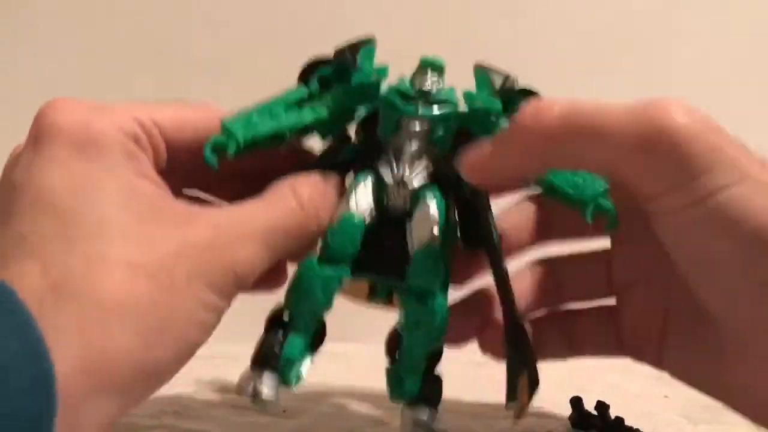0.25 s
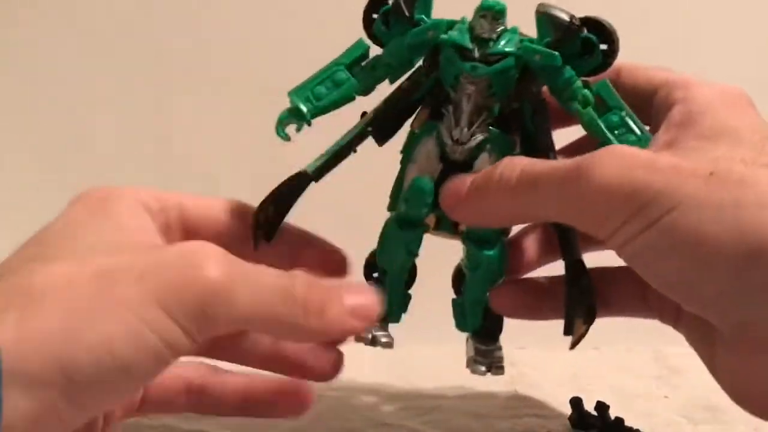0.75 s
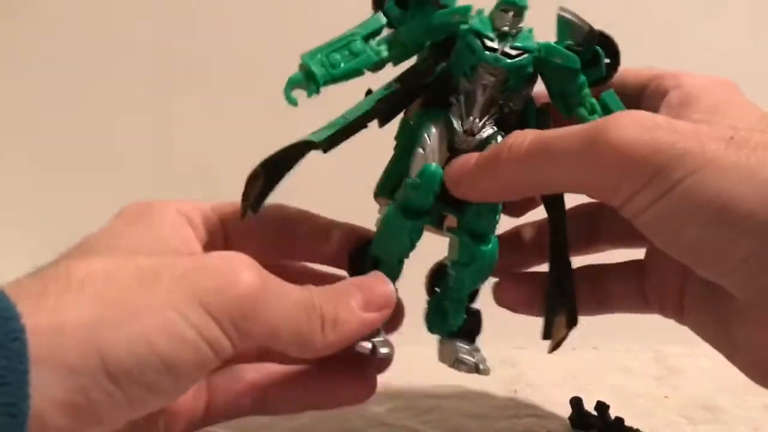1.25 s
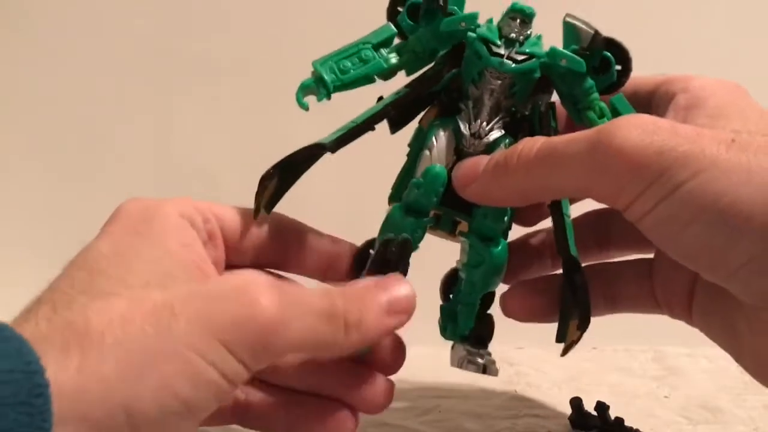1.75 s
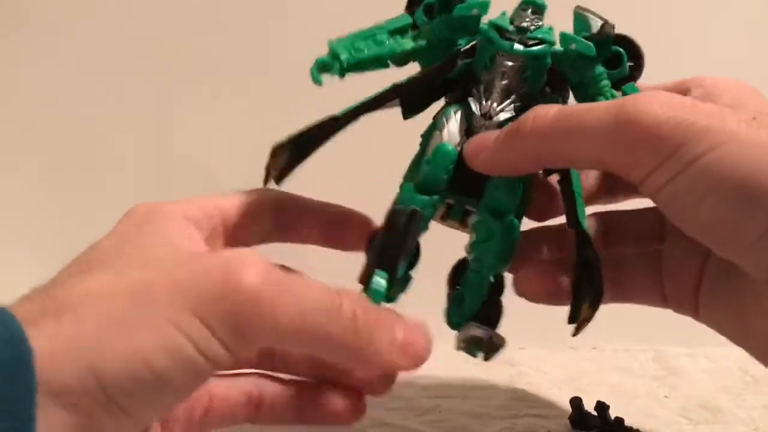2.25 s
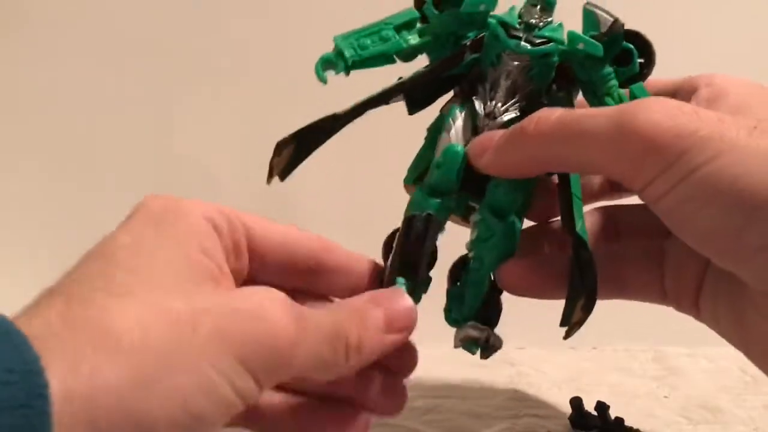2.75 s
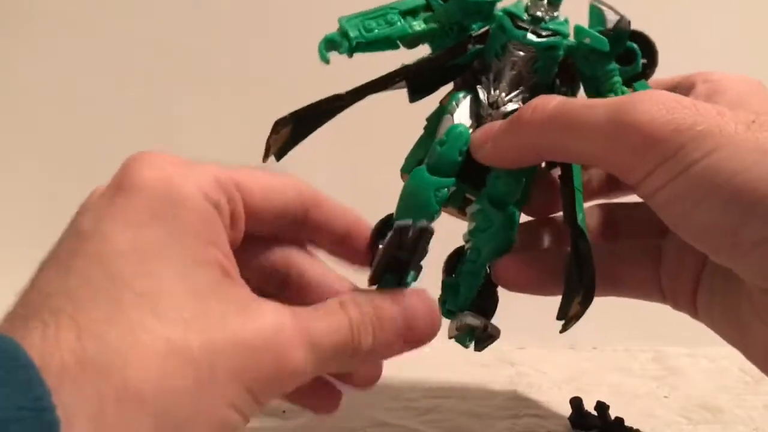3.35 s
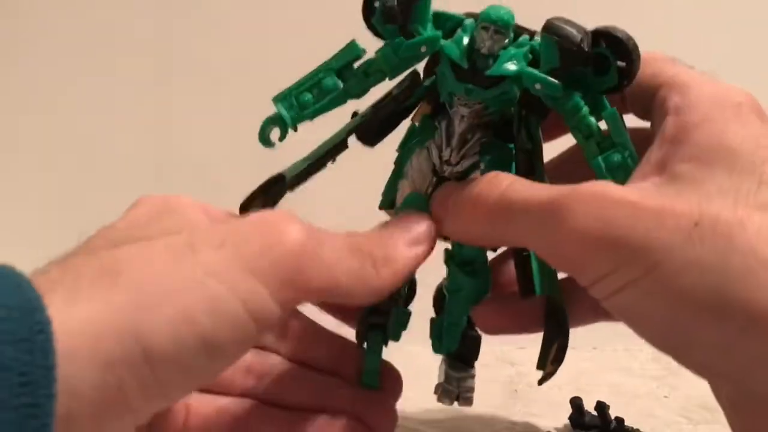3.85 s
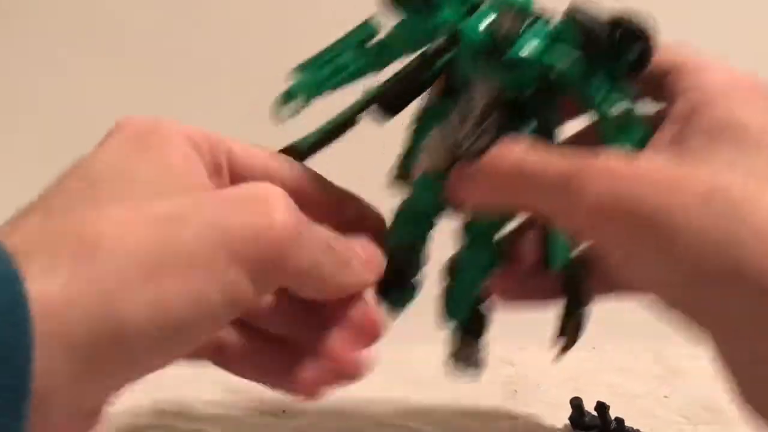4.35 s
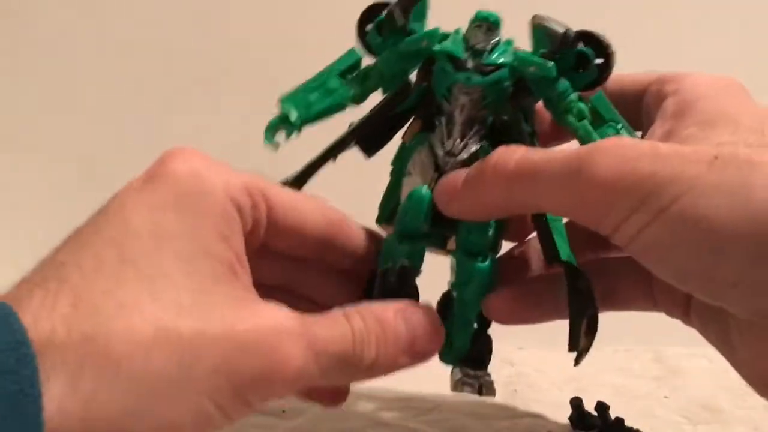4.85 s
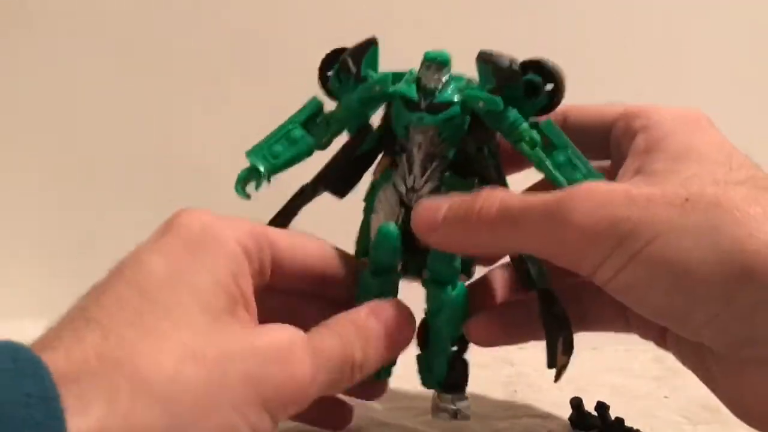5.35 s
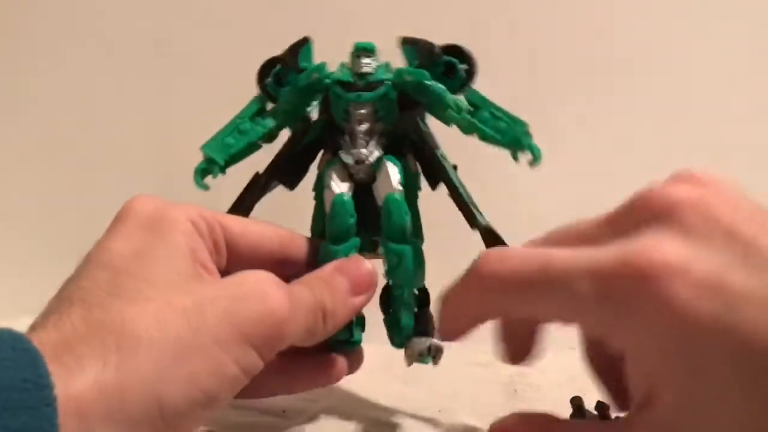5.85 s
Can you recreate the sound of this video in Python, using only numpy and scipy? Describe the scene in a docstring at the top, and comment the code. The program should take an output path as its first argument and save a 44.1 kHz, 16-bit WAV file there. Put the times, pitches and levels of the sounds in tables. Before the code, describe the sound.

Hands turn and fold a light plastic toy over a table. Rapid clattering clicks come first, peaking early, then thin out into tiny ticks, rustles and brief fingertip scuffs. Later a faint steady rush rises, a joint grates with clicks and a dull low bump, then a sharp snap knocks the table. Low hum and slight hiss lie beneath; close, dry, small-room sound.

```python
"""At a table in a quiet, humming room a hollow plastic figure is turned and folded close to a small microphone.
Joints click as scratchy bursts driving damped shell modes; loose panels rattle and rub as showers of ringing
grains. Dragged joints and sliding fingertips scratch as resonant noise. Hum, hiss and a passing steady rush are
coloured noise. A soft bump, and later a hard snap, set low modes of the table top ringing."""
import sys
import numpy as np
from scipy import signal
from scipy.fft import rfft, irfft, next_fast_len
from scipy.io import wavfile
from scipy.ndimage import uniform_filter1d, minimum_filter1d

SR = 44100
rng = np.random.default_rng(int(sys.argv[2]) if len(sys.argv) > 2 else 0)


def pcm_store(signal):
    """Save signal as 16-bit PCM."""
    levels = np.round(np.clip(np.atleast_2d(signal), -1, 1) * 32767)
    wavfile.write(sys.argv[1], SR, levels.astype(np.int16).T)


N = 269533

# room resonances in the hum: centre_hz, width_hz, level_db
HUM_RESONANCES = [(57, 13, -60), (132.8, 9.1, -66.5), (211.6, 19, -65.5), (303, 9.8, -75)]
# colour of the room hum: frequency_hz, density_db (relative, per Hz)
HUM_COLOUR = [(18, -35), (30, -3), (65, 4), (168, -11), (221, -7.5), (473, -20.5), (955, -23.5),
              (1330, -23), (2500, -36.5), (3250, -61.5), (5500, -120)]
# microphone hiss swelling and sinking: time_s, treble_level_db (above 9 kHz)
HISS_LEVEL = [(0, -68.5), (.2, -66.5), (.5, -79.5), (.66, -56.5), (.83, -68), (1.02, -66), (1.14, -73),
              (1.41, -80.5), (3.98, -75.5), (4.25, -71), (4.41, -81), (5.04, -70.5), (5.21, -64.5),
              (5.55, -71), (5.73, -80.5), (6.11, -74)]
# colour of the hiss: frequency_hz, density_db (relative, per Hz)
HISS_COLOUR = [(180, -21), (300, -3.5), (535, -8.5), (631, -10), (1040, -8.5), (1260, -11.5), (3470, -15.5),
               (12400, -20), (15600, -20)]
# steady rush: start_s, length_s, level_db
RUSHES = [(3.48, 1.6, -60.5), (5.12, 0.42, -67.5)]
# colour of the rush: frequency_hz, density_db (relative, per Hz)
RUSH_COLOUR = [(180, -36), (300, -1.5), (441, -0.5), (577, 0.5), (1050, 0.5), (1610, -4), (3570, -8.5),
               (6770, -26.5), (9000, -21.5), (11700, -63), (19800, -120)]
# parts rubbing in the fingers: time_s, level_db
HANDLING_LEVEL = [(0, -75), (.25, -77.5), (.8, -66.5), (1.3, -73), (1.5, -82), (2, -84.5), (2.3, -76.5),
                  (2.7, -84.5), (3.15, -82.5), (3.28, -75), (3.45, -76.5), (3.95, -74.5), (4.4, -65),
                  (4.7, -74.5), (5, -73.5), (5.35, -64), (5.6, -78.5), (6.11, -82.5)]
# joint clicks: start_s, peak_db, centre_hz (of the part that rings), treble_db, knock_db,
# burst_t60_s (limited to 0.002-0.2 s)
CLICKS = [(.2554, -42.5, 4146, -6, -4, 0.012), (.2835, -34.5, 3993, -23, -12, 0.023),
          (.2875, -28, 4630, -9.5, -9, 0.031), (.298, -30.5, 5450, -20, -9.5, 0.047),
          (.3145, -28.5, 5675, -22, -19, 0.018), (0.3242, -23, 5113, -16, -16, 0.0081),
          (0.3323, -38, 3920, -9, -2, 0.047), (0.3557, -28, 5080, -25, -18, 0.014),
          (0.4822, -36.5, 5480, -19, -12, 0.039), (0.4941, -23.5, 4240, -8, -19, 0.022),
          (0.5022, -26, 5540, -23, -8.5, 0.026), (.5267, -39.5, 3990, -16, -15, 0.03),
          (0.5378, -38.5, 5200, -8, -4, 0.019), (0.553, -18, 3660, -10.5, -11, 0.0078),
          (.5548, -17.5, 3425, -7.5, -10, 0.01), (0.574, -13, 4000, -33, -17, 0.0054),
          (0.5821, -36, 3874, -24, -14, 0.025), (0.6084, -23.5, 3993, -3, -3.5, 0.02),
          (0.6147, -18.5, 6300, -6, -11, 0.0046), (0.6189, -3, 4150, -8.5, -13.5, 0.0094),
          (0.6199, -16.5, 1735, -33, -23, 0.0027), (0.6227, -6.5, 5450, -5, -15.5, 0.035),
          (0.6289, -15, 5670, -9.5, -27, 0.0088), (.634, -24.5, 5870, -11.5, -25.5, 0.013),
          (.6508, -13.5, 5230, -12, -27, 0.015), (0.6722, -23, 5600, -20, -21, 0.01),
          (0.7185, -29, 5540, -15, -7, 0.19), (.7288, -25, 5495, 8, -15, 0.015),
          (.741, -17, 5630, -8.5, -21, 0.02), (0.7916, -38, 4090, 0, -17, .014),
          (0.8072, -35.5, 5820, -10, -7, 0.014), (0.8367, -44, 3627, -11, -6, 0.017),
          (0.9078, -22, 3416, -12, -17.5, 0.0095), (.9277, -30.5, 6100, -19, -11, .019),
          (0.9452, -37, 4390, -8, -17, 0.034), (.9586, -40, 3430, -15, -12, 0.018),
          (0.9689, -35, 5870, -21, -20, 0.0099), (1.013, -37.5, 5940, -9, -14, .01),
          (1.017, -15.5, 6390, 5, -12.5, .012), (1.0243, -31, 5980, -22, -14, 0.022),
          (1.0473, -42.5, 3075, -7, -15, .027), (1.0666, -35.5, 5410, -30, -12.5, 0.053),
          (1.0902, -48, 5280, -14, -16, .01), (1.1027, -40, 4010, -22, -7, 0.017),
          (1.159, -28.5, 5824, -23, -23, 0.016), (1.1654, -40.5, 7620, -3, -20, 0.0076),
          (1.203, -34, 4330, -9.5, -15.5, 0.014), (1.231, -49, 4130, -14, 1.5, 0.02),
          (1.283, -52, 4320, -12.5, -2, 0.0056), (1.3259, -50, 6020, -3, -13.5, .009),
          (1.334, -48.5, 4600, -3, -2.5, 0.033), (1.3969, -42, 5850, -16, -13.5, .006),
          (1.4166, -51.5, 3290, -14, -8, 0.013), (1.4571, -48.5, 2860, -13, -4, 0.022),
          (1.567, -43.5, 4320, -19, -6, .013), (1.5872, -49.5, 4310, -10, 0, 0.0091),
          (1.6268, -31, 5204, -21, -8, 0.0069), (1.6419, -43, 5400, -12.5, -3, 0.022),
          (1.6521, -45.5, 4180, -19, -15, .045), (1.6835, -44, 2846, -18, -4.5, 0.026),
          (1.8278, -40, 4355, -8.5, -15.5, .015), (1.862, -38, 4807, -20, -11, 0.016),
          (2.0717, -42.5, 5694, -10.5, -19, 0.023), (2.0971, -40.5, 5910, -15, -10, 0.12),
          (2.11, -31, 5774, -23, -14, 0.018), (2.119, -39, 5870, -21, -14, 0.016),
          (2.1518, -33.5, 5425, -20, -9.5, .024), (2.1836, -35.5, 5850, -21.5, -18, .012),
          (2.2792, -35, 5670, -10.5, -14.5, 0.021), (2.314, -47.5, 5540, -14, -10, 0.037),
          (2.443, -53.5, 5577, -16, -11, 0.004), (2.498, -50.5, 5596, -9.5, -10, 0.017),
          (2.5514, -31.5, 5815, 3.5, -5, 0.024), (2.658, -52, 2978, -14, -6, 0.026),
          (2.6788, -45, 2930, -19.5, -2, 0.022), (2.7026, -50.5, 4895, -15, -5, 0.0097),
          (2.7467, -41.5, 4220, -14, -2, 0.009), (2.7542, -51.5, 4320, -12, -3, 0.0099),
          (2.7683, -50, 4370, -18, -11, 0.0046), (2.779, -53.5, 4350, -14.5, -7.5, .005),
          (2.8414, -49.5, 4500, 0, -9, .016), (2.8532, -54, 4346, -10.5, -8, 0.0075),
          (2.9338, -47.5, 3458, -22, -8, 0.033), (2.9373, -36, 4570, -15, -15, 0.011),
          (2.9672, -47.5, 4310, -3, -7, 0.0099), (2.9887, -37, 4480, -1, -4, 0.022),
          (3.0361, -40, 4290, -12, -7, 0.0018), (3.048, -53, 3786, -7, 0, 0.017),
          (3.0627, -55, 2610, -5, -15, 0.033), (3.0744, -40, 7500, -4, -13, .009),
          (3.121, -44.5, 4174, -8.5, -7, .007), (3.172, -50.5, 4393, -13, -7, .009),
          (3.2022, -39.5, 7190, 3.5, -6.5, 0.011), (3.3047, -50.5, 2840, -10, -2, 0.073),
          (3.3222, -41.5, 4180, -11, -6.5, 0.0069), (3.4295, -50.5, 5170, -8.5, 1.5, 0.02),
          (3.8922, -44, 2930, -8, -3, 0.014), (4.008, -39, 5600, -10, -13, 0.013),
          (4.0157, -43.5, 5333, -5, -19, .044), (4.0287, -44, 5660, -11, -7, .032),
          (4.0708, -23.5, 5820, 2.5, -2, 0.0059), (4.0785, -37.5, 5460, -13, -20, 0.16),
          (4.0876, -38.5, 6000, -5, -32, 0.078), (4.1821, -25.5, 4210, -3, -5.5, 0.0037),
          (4.1937, -39.5, 4330, -3, -6, 0.082), (4.2657, -20, 5785, 0.5, -7, 0.041),
          (4.2757, -24.5, 5443, -1.5, -11, 0.14), (4.3501, -29.5, 2794, -17, 6.5, 0.015),
          (4.3526, -35.5, 1723, -30, -21, 0.014), (4.361, -42.5, 4060, -8, -1, 0.2),
          (4.416, -40, 3100, -1, 9, 0.025), (4.4553, -31.5, 5720, -16, -2.5, 0.0052),
          (4.474, -43, 6010, -18, -4, 0.022), (4.5947, -37, 5760, -5, -12, 0.058),
          (4.6058, -40, 5800, -23, -15, 0.022), (4.7025, -42, 4015, -7.5, 7.5, 0.16),
          (4.727, -46, 4220, -15, 6, 0.053), (4.967, -37, 4960, -14, -2.5, .015),
          (4.975, -46, 5100, -12.5, -13.5, 0.12), (4.9867, -46, 4940, -19, -7, 0.014),
          (5.0393, -38, 7190, 9, -25, 0.0034), (5.049, -39, 7350, -2, -27.5, 0.011),
          (5.0571, -29.5, 7350, -6, -23.5, 0.011), (5.0598, -3.5, 7430, -5, -9, 0.0083),
          (5.0619, -6, 4663, 4, -10.5, 0.016), (5.0605, -20.5, 719, -24, -16, 0.0094),
          (5.068, -25.5, 5100, -5.5, -31.5, 0.38), (5.0736, -23, 7220, -1.5, -36, 0.28),
          (5.089, -26, 7200, 0.5, -36, .03), (5.2426, -30, 4050, -9, -21, 0.0046),
          (5.27, -37.5, 4058, 10, 2, .027), (5.2959, -42, 6240, -17, -13, 0.031),
          (5.308, -37, 7260, -9, -8.5, 0.023), (5.3278, -37, 3540, -10, -15, 0.068),
          (5.335, -35, 6020, -12, -14, 0.015), (5.3402, -30.5, 5940, -16, -31, 0.04),
          (5.3609, -38.5, 6314, -6, -11, 0.013), (5.4523, -39.5, 3994, -5, 11, 0.0082),
          (5.4852, -36, 4344, -13, -17, 0.037), (5.4963, -22.5, 4200, -14, -12, 0.013),
          (5.4995, -33.5, 1173, -12, -30, 0.0067), (5.514, -43, 4200, -12, -15, 0.082),
          (5.546, -43.5, 4320, -8, -20, .023), (5.5691, -51, 3380, -20, -18, 0.022),
          (5.9328, -48, 3796, -13, -7.5, .008), (5.9521, -50, 3623, -11, -3.5, 0.031),
          (5.958, -53.5, 5660, -21, -20, 0.077), (6.054, -42, 3453, -31, -8, 0.021),
          (6.0652, -35, 3500, -25, -21.5, 0.025), (6.0649, -37.5, 6150, -25, -13, 0.016),
          (6.0852, -39.5, 6150, -31.5, -12, 0.018)]
# broad, damped modes of the plastic shells: centre_hz, width_hz, gain_db
SHELL_MODES = [(540, 210, -0.5), (1137, 320, 0), (1970, 400, -2), (2980, 500, 6), (3900, 750, 1.5),
               (4430, 390, 6), (5090, 1100, 0.5), (5850, 790, 6.5), (6290, 970, 2), (6995, 540, 2.5),
               (9070, 1700, -6.5), (11460, 540, -4), (12250, 1000, -6), (13830, 1400, -7.5),
               (14600, 1700, -15)]
# reverberation of the room: frequency_hz, t60_s
ROOM_DECAY = [(300, 0.12), (1500, 0.17), (4000, 0.12), (12000, 0.16)]
# modes of the leg joint: centre_hz, width_hz, gain_db
JOINT_MODES = [(3040, 280, -7.5), (4490, 60, -9.5), (5750, 180, -6), (6100, 78, -4), (8670, 77, -11.5),
               (10000, 200, -24), (11900, 300, -28)]
# strokes of the joint dragged round: start_s, length_s, level_db (at the start)
DRAG_STROKES = [(1.55, 0.075, -66), (1.63, 0.077, -63.5), (2.28, .05, -62.5), (2.5, 0.063, -66),
                (2.56, 0.093, -64), (2.66, 0.037, -63), (4.38, 0.082, -54.5), (4.452, .08, -54),
                (4.543, .055, -61), (4.594, 0.093, -53)]
# fingertips sliding on smooth panels: start_s, length_s, level_db, centre_hz, width_hz
FINGER_SLIDES = [(1.337, 0.025, -72.5, 4930, 3000), (3.062, .025, -58.5, 9200, 1500),
                 (3.204, 0.06, -64.5, 8700, 2550), (3.257, 0.046, -63, 8300, 3500),
                 (3.291, 0.076, -73, 12600, 3010), (3.44, 0.058, -68, 9070, 5970),
                 (4.71, 0.056, -70.5, 9000, 6000), (5.523, 0.035, -63, 7900, 7160)]
# blows to the table: start_s, level_db, decay_ratio (to the free table), contact_s (time constant)
THUDS = [(4.471, -19.5, 1, 0.00079), (5.0605, -17.5, 0.35, 0.00023)]
# modes of the free table top: frequency_hz, gain_db, t60_s
TABLE_MODES = [(59.8, -11, 0.36), (127.2, -2.5, 0.064), (190, -9.5, 0.15), (431.5, -12, 0.065),
               (620, -18.5, 0.067)]

HUM_DB = -63.5  # rms of the broad hum
# rattle after a click: dB at a 0 dB click, dB per dB of click, s
RATTLE_DB, RATTLE_GROWS, RATTLE_T60_S = -42.5, 0.92, 0.39
HANDLING_HZ = 4260
HANDLING_SPREAD, RATTLE_SPREAD = 0.19, 0.23  # scatter of the grains' pitch (log Hz)
ROOM_DB = -14  # the room's answer under each click
EDGE_S = 0.0063  # rise and fall of a drag stroke or rush
DRAG_FADE_DB_PER_S = 120  # a stroke starts with a jerk and slackens
TOP_HZ = 16800  # band limit


def amp(db):
    """Decibel law: amplitude gain of a dB value."""
    return 10 ** (np.asarray(db) / 20)


def unit(x):
    """Normalisation: x at rms 1."""
    return x / np.sqrt(np.mean(x ** 2) + 1e-20)


def along(points, hz):
    """Interpolation of (Hz, value) points on a logarithmic frequency axis."""
    f, v = np.transpose(points)
    return np.interp(np.log(hz + 1), np.log(f + 1), v)


def level_curve(rows):
    """Linear interpolation in time: one level in dB per sample from (s, dB) rows."""
    s, db = np.transpose(rows)
    return np.interp(np.arange(N) / SR, s, db)


def filtered(x, response):
    """Linear filtering: the spectrum of x times a response of frequency."""
    m = next_fast_len(N + SR // 2)
    return irfft(rfft(x, m) * response(np.fft.rfftfreq(m, 1 / SR)), m)[..., :N]


def noise(colour):
    """Coloured noise: white noise shaped by a spectrum, at rms 1."""
    return unit(filtered(rng.standard_normal(N), lambda hz: amp(along(colour, hz))))


def resonances(modes, f):
    """Modal superposition: response at f of (Hz, width, gain) modes of alternating sign."""
    total = 0
    for k, (centre, width, gain) in enumerate(modes):
        damping = 1j * f * width
        total = total + (-1) ** k * gain * damping / (centre * centre - f * f + damping)
    return total


def spans(rows, fade_db_per_s=0):
    """Gated envelope: gain of (start, length, dB) rows with a short rise, a hold that may fade, a short fall."""
    t = np.arange(N) / SR
    gain = np.zeros(N)
    for s, length, db in rows:
        hold = amp(db - fade_db_per_s * np.clip(t - s, 0, length))
        edges = np.clip(np.minimum(t - s, s + length - t) / EDGE_S, 0, 1)
        gain += hold * edges
    return gain


def add(track, s, sound):
    """Superposition: mixes a sound into a track at a time."""
    part = track[round(s * SR):][:len(sound)]
    part += sound[:len(part)]


def background():
    """Stationary noise: low hum with room resonances, swelling microphone hiss and the passing rush."""
    hum = amp(HUM_DB) * noise(HUM_COLOUR)
    for centre_hz, width_hz, db in HUM_RESONANCES:
        mode = [(centre_hz, width_hz, 1)]
        hum += amp(db) * unit(filtered(rng.standard_normal(N), lambda f: resonances(mode, f)))
    hiss = noise(HISS_COLOUR)
    hiss /= np.std(filtered(hiss, lambda hz: hz > 9000))
    return hum + amp(level_curve(HISS_LEVEL)) * hiss + spans(RUSHES) * noise(RUSH_COLOUR)


def shaking():
    """Energy balance: steady handling plus the decaying rattle each click leaves near its own ring."""
    s, peak_db, hz = np.transpose(CLICKS)[:3]
    at = np.round(s * SR).astype(int)
    # the factor 2 turns amplitude dB into power
    kick = amp(2 * (RATTLE_DB + RATTLE_GROWS * peak_db))
    kicks = [np.bincount(at, kick, N), np.bincount(at, kick * hz, N)]
    decay = amp(-2 * 60 / (RATTLE_T60_S * SR))
    rattle, pitched = signal.lfilter([1], [1, -decay], kicks)
    steady = amp(2 * level_curve(HANDLING_LEVEL))
    power = steady + rattle
    # power-weighted means
    centre_hz = (steady * HANDLING_HZ + pitched) / power
    spread = (steady * HANDLING_SPREAD + rattle * RATTLE_SPREAD) / power
    return power, centre_hz, spread


def rustle(grains_per_s=2500, cycles=8, scatter_db=4.5):
    """Stick-slip: tiny slips of rubbing parts, each a short ring near the colour of the part being handled."""
    power, centre_hz, spread = shaking()
    count = int(grains_per_s * N / SR)
    at = rng.integers(0, N - 200, count)
    pitch_hz = centre_hz[at] * np.exp(spread[at] * rng.standard_normal(count))
    hz = np.clip(pitch_hz, 800, 15000)[:, None]
    t = np.arange(200) / SR
    strength = amp(scatter_db * np.minimum(rng.exponential(size=(count, 1)), 4))
    # each ring falls to 1/e in the given number of cycles
    grains = strength * np.exp(-t * hz / cycles) * np.sin(2 * np.pi * hz * t)
    places = at[:, None] + np.arange(200)
    shower = np.bincount(places.ravel(), grains.ravel(), N)
    return np.sqrt(power) * unit(shower)


def tap(centre_hz, treble_db, knock_db, t60, draw):
    """Impact excitation: a short scratchy burst drives the shell, most near the struck part's ring; peak 1."""
    rise_s = 0.00036
    t = np.arange(4096) / SR
    hz, width, db = np.transpose(SHELL_MODES)
    distance = np.log(hz / centre_hz)
    # a narrow peak on a broad skirt 10 dB down
    near = np.exp(-.5 * (distance / 0.077) ** 2) + amp(-10) * np.exp(-.5 * (distance / 0.8) ** 2)
    weight = np.where(hz < 2200, amp(knock_db), near)
    weight = np.where(hz > 8000, amp(treble_db), weight)
    weight = weight * amp(db + 2.7 * draw[-len(hz):])  # each tap excites the modes a little differently
    burst = draw[:len(t)] * amp(-60 * t / np.clip(t60, .002, .2)) * (1 - np.exp(-t / rise_s))
    burst[round(rise_s * SR)] += 2.3  # one hard, dry impulse at the touch
    f = np.fft.rfftfreq(len(t), 1 / SR)
    own_ring = resonances([(centre_hz, centre_hz / 11, 1)], f)
    body = resonances(zip(hz, width, weight), f) + own_ring
    sound = irfft(rfft(burst) * body)
    return sound / np.abs(sound).max()


def echo(sound, draw):
    """Reverberation: after a 5 ms gap each frequency of a noise tail dies at its own speed."""
    hz, t, z = signal.stft(draw, SR, nperseg=256)
    decay = amp(-60 * t / along(ROOM_DECAY, hz)[:, None])
    tail = signal.istft(z * decay, SR, nperseg=256)[1]
    tail = tail / np.linalg.norm(tail)
    return np.pad(signal.fftconvolve(sound, tail), (SR // 200, 0))


def clicks():
    """Impact and reverberation: joints snap, and the room answers each one anew."""
    out = np.zeros(N)
    draws = rng.standard_normal((len(CLICKS), SR // 3))
    for (s, peak_db, *part), draw in zip(CLICKS, draws):
        sound = amp(peak_db) * tap(*part, draw[:SR // 10])
        add(out, s, sound)
        add(out, s, amp(ROOM_DB) * echo(sound, draw[SR // 10:]))
    return out


def friction(lumpy_db=2.0):
    """Friction noise: uneven scratching makes the dragged joint sing in its modes and fingers hiss on panels."""
    lumps = unit(uniform_filter1d(rng.standard_normal((2, N)), SR // 300))
    joint_scratch, finger_scratch = rng.standard_normal((2, N)) * amp(lumpy_db * lumps)
    modes = [(centre_hz, width_hz, amp(db)) for centre_hz, width_hz, db in JOINT_MODES]
    singing = unit(filtered(joint_scratch, lambda f: resonances(modes, f)))
    out = spans(DRAG_STROKES, DRAG_FADE_DB_PER_S) * singing
    for s, length, db, centre_hz, width_hz in FINGER_SLIDES:
        part = finger_scratch[round(s * SR):][:round(length * SR)]
        f = np.fft.rfftfreq(len(part), 1 / SR)
        band = resonances([(centre_hz, width_hz, 1)], f) ** 2
        hiss = unit(irfft(rfft(part) * band, len(part)))
        add(out, s, amp(db) * signal.windows.tukey(len(part), .5) * hiss)
    return out


def thud(scuff_db=-8, scuff_t60_s=0.1):
    """Modal decay: blows ring the table top low, with a dull scuff; a longer contact is duller."""
    out = np.zeros(N)
    t = np.arange(SR // 3) / SR
    scuff_colour = [(40, -19), (150, 5.0), (600, -4.5), (1100, -32.5), (3000, -88.5)]  # Hz, dB per Hz
    for s, level_db, decay, contact_s in THUDS:
        ring = np.zeros(len(t))
        for k, (hz, db, t60) in enumerate(TABLE_MODES):
            ring += (-1) ** k * amp(db - 60 * t / (decay * t60)) * np.sin(2 * np.pi * hz * t)
        scuff = amp(scuff_db - 60 * t / (decay * scuff_t60_s)) * noise(scuff_colour)[:len(t)]
        contact = np.exp(-t / contact_s) / (1 + contact_s * SR)
        add(out, s, amp(level_db) * signal.fftconvolve(ring + scuff, contact)[:len(t)])
    return out


def scene():
    """Superposition: every source summed at the single microphone."""
    return (background() + rustle() + clicks() + friction() + thud())[None]


def record(dry, knee_db=-12, slope=1.0, smooth_s=0.024, low_hz=40):
    """Gain control and band limiting: loud peaks duck the level for a moment; deep bass and top are cut."""
    over_db = np.maximum(20 * np.log10(np.abs(dry[0]) + 1e-9) - knee_db, 0)
    # the largest excess is held for 1/7 s, then smoothed
    held_db = -minimum_filter1d(-over_db, SR // 7, origin=SR // 14 - 1)
    fade = np.exp(-1 / (smooth_s * SR))
    duck_db = slope * signal.lfilter([1 - fade], [1, -fade], held_db)

    def capsule(hz):
        """Band-pass response: steep bass cut, and a slope down to silence at the band limit."""
        top = np.clip((TOP_HZ - hz) / 1000, 0, 1) ** 2
        return top / np.sqrt(1 + (low_hz / (hz + 1)) ** 8)

    return filtered(dry * amp(-duck_db), capsule)


dry = scene()
out = record(dry)
pcm_store(out)
```